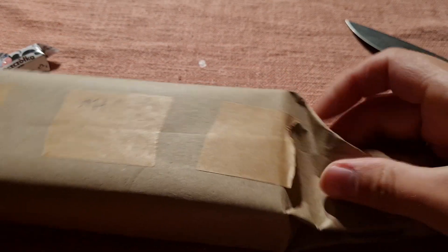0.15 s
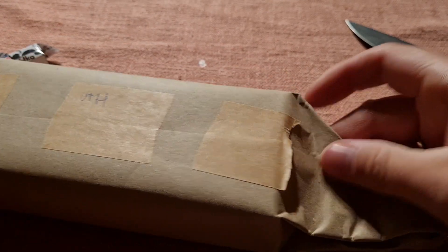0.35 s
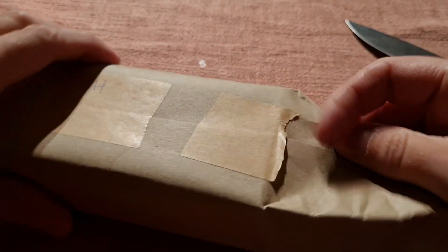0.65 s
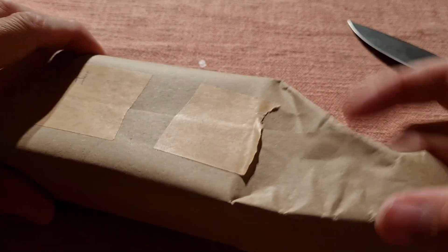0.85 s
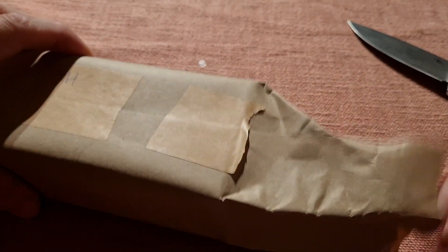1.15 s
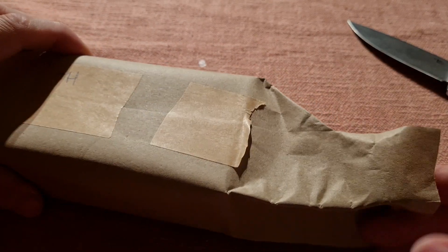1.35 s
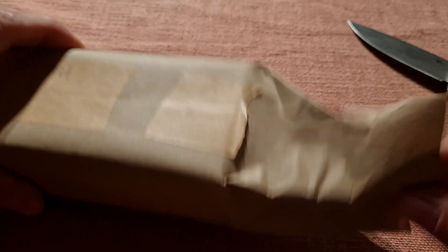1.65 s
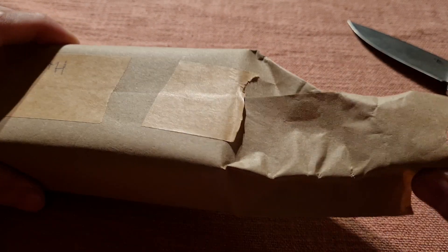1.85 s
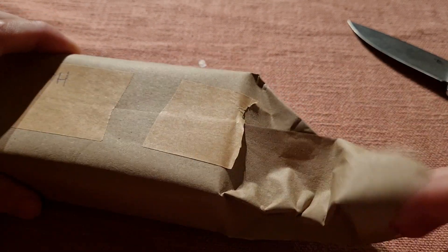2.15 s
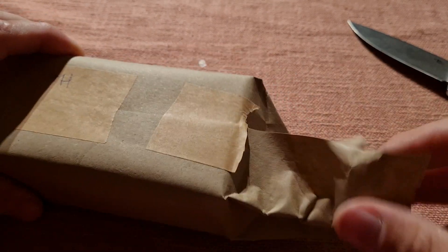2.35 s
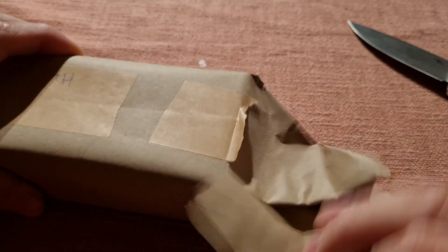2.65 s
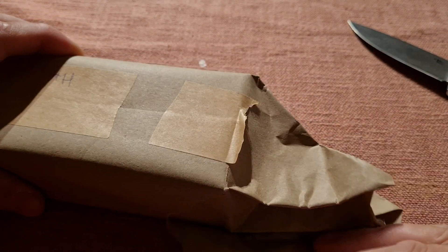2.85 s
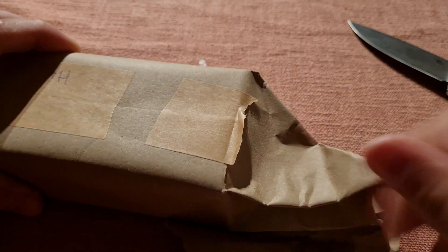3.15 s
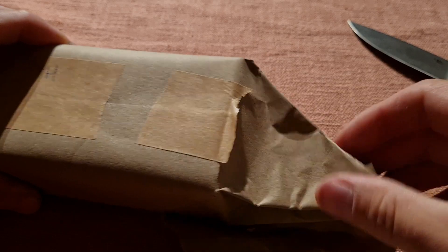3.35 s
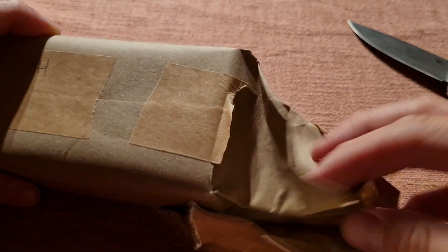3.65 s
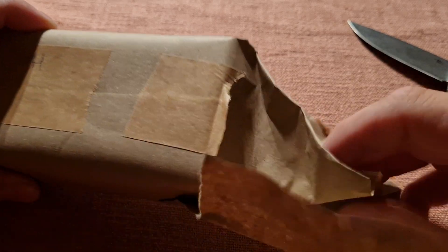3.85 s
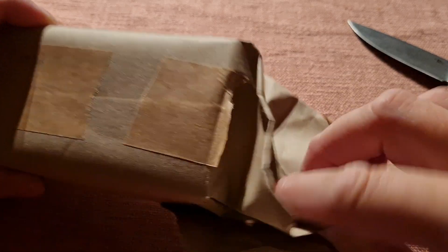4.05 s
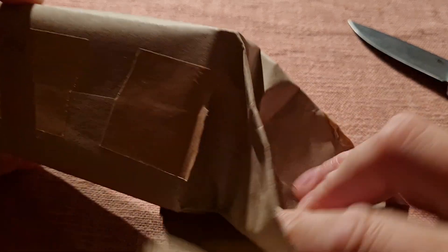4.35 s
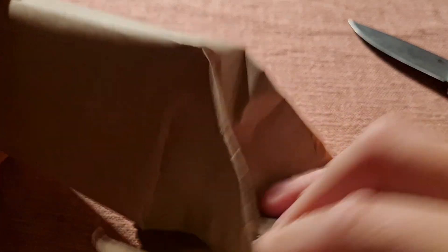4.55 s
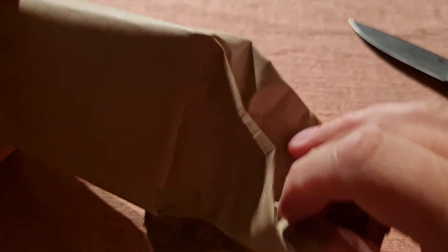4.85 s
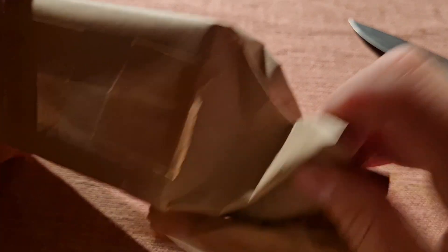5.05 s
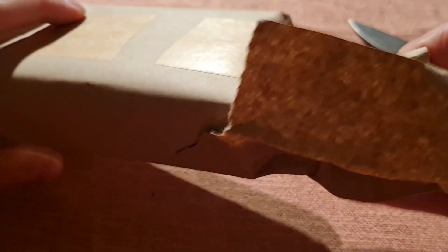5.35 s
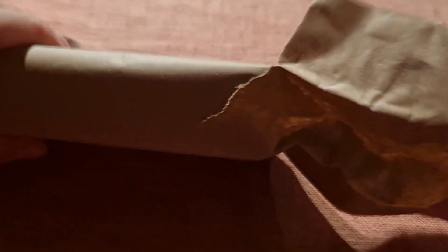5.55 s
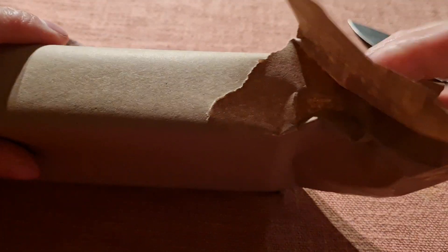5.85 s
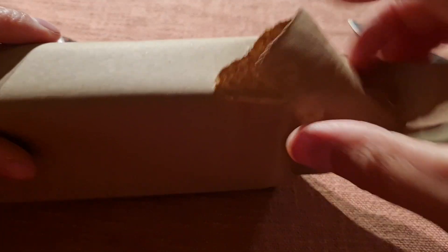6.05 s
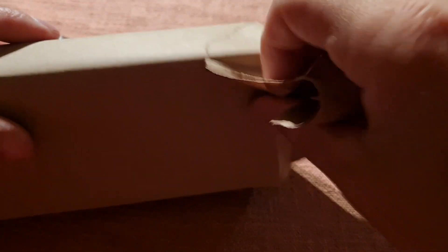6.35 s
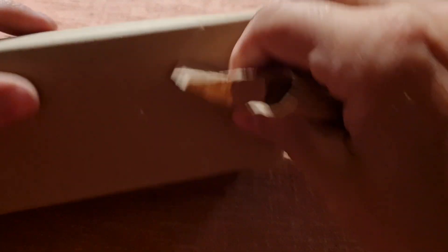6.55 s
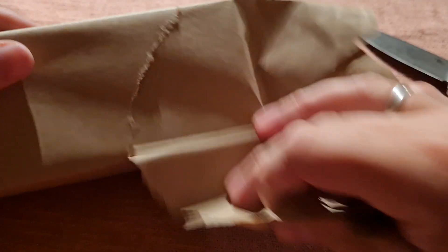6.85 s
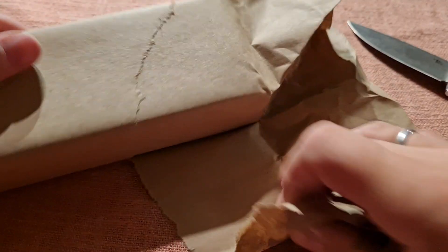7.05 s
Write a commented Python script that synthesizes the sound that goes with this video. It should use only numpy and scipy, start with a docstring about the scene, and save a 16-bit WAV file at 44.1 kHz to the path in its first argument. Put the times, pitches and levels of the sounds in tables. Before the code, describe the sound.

Close stereo sound of thick, stiff paper handled around a box in a small, dry room with faint low air. From 0 to 1.3 s, quick bright rustles and crisp snaps, strongest near 0.6 s, with a soft papery flap around 0.75. From 1.3 to 2 s it eases into smaller crackles and near pauses. At 2.03 s brisk crumpling resumes, leading to a short, jerky rip from 2.6 to 2.95 s, full of sharp fibre pops. Then quieter: isolated snaps near 3.1, 3.3 and 3.7, smooth finger glides around 4 and 4.6 to 4.9, a cluster of pops at 4.4. Rustling thickens from 5.2, with hollow low bumps around 5.5, growing denser through 6.5 s. A longer rip follows, dipping around 6.8 amid hard low snaps, surging to its loudest just before 7 s, then quickly trailing off.

```python
"""Thick paper around a box on a cloth-covered table, pulled, crumpled and twice ripped by hand, close up.
Showers of tiny damped rings over friction noise make the rustle and the tearing fibres; shaped noise bursts
make single snaps and ticks, loud and faint; damped sines make the sheet flap and the box bump; swept noise
makes fingers glide. Short noise tails answer as a small room, over faint air."""
import sys
import numpy as np
from scipy import signal
from scipy.fft import rfft, irfft, next_fast_len
from scipy.io import wavfile
from scipy.ndimage import uniform_filter1d, map_coordinates

SR = 44100
rng = np.random.default_rng(int(sys.argv[2]) if len(sys.argv) > 2 else 0)


def master_out(mix):
    """Clip the mix to full scale and print it as 16-bit PCM to the path in sys.argv[1]."""
    frames = np.transpose(np.atleast_2d(mix))
    ceiling = np.clip(frames, -1, 1)
    pcm = np.round(ceiling * 32767).astype(np.int16)
    wavfile.write(sys.argv[1], SR, pcm)


N = 317941

# frequency response of the microphones: f/Hz, level/dB
MIC_RESPONSE = [(30, -7), (55, -2), (5000, -1), (7400, 0.5), (8600, -8.5), (10500, -5), (15000, -5)]
ATTACK_S, RELEASE_DB_PER_S = 0.011, 456  # the paper takes up a movement and settles after it


def amp(db):
    """Decibels to gain."""
    return 10 ** (np.asarray(db) / 20)


def unit(x):
    """x at rms 1."""
    return x / np.sqrt(np.mean(x ** 2) + 1e-20)


def along(points, hz):
    """Read a curve of (Hz, value) points on a log frequency axis."""
    f, v = np.transpose(points)
    return np.interp(np.log(hz + 1), np.log(f + 1), v)


def wobble(rate):
    """A smooth random curve with rate knots a second."""
    knots = rng.standard_normal(int(N * rate / SR) + 4)
    return map_coordinates(knots, [np.arange(N) * rate / SR])


def filtered(x, response):
    """x with its spectrum multiplied by a response of frequency."""
    m = next_fast_len(N + SR // 2)
    hz = np.fft.rfftfreq(m, 1 / SR)
    return irfft(rfft(x, m) * response(hz), m)[..., :N]


def causal(gain):
    """The quickest causal (minimum-phase) response that has this gain."""
    cepstrum = irfft(np.log(np.maximum(gain, 1e-6)))
    half = len(cepstrum) // 2
    folded = np.r_[cepstrum[0], 2 * cepstrum[1:half], np.zeros(half)]
    return np.exp(rfft(folded))


def add(track, s, sound):
    """Mix a sound into a track at s seconds."""
    part = track[:, max(round(s * SR), 0):][:, :sound.shape[-1]]
    part += sound[..., :part.shape[1]]


def ports(pair, hz):
    """Two unrelated spectra become left and right: alike in the bass, apart in the treble."""
    # left-right correlation: f/Hz, likeness/1
    likeness = [(100, 1), (300, 0.85), (700, 0.83), (1400, 0.5), (2800, 0.27), (6000, 0), (14000, 0.016)]
    turn = np.arccos(np.clip(along(likeness, hz), -1, 1)) / 2
    mid, side = pair[0] * np.cos(turn), pair[1] * np.sin(turn)
    return np.array([mid + side, mid - side])


def sway():
    """Left and right gains that follow where the hands work."""
    # balance: t/s, left over right/dB
    balance = [(0, 1), (.7, 0.5), (1.6, 0), (2.5, 1.5), (3.2, 1), (3.7, 0.5), (4.3, 2.5), (5.0, 3.5),
               (5.7, 0.5), (6.6, 2), (7.2, 0.5)]
    left_db = np.interp(np.arange(N) / SR, *np.transpose(balance))
    return amp(np.array([[.5], [-.5]]) * left_db)


def gesture(length, swell_db):
    """Gain of one movement: a quick attack, a hold that swells or eases, a steady release."""
    t = np.arange(SR // 2) / SR - ATTACK_S / 2
    attack = np.clip(t / ATTACK_S + .5, 0, 1)
    hold_db = swell_db * (np.clip(t / length, 0, 1) - .5)
    return attack * amp(hold_db - RELEASE_DB_PER_S * np.maximum(t - length, 0))


def handling(slack_db=-15):
    """Strokes and the holding hand add in power to relative bulge, flex, crackle and fizz levels in dB."""
    # a hand pushes, pulls or slides the paper: start/s, length/s, crackle level/dB, swell over the stroke/dB,
    # then relative to the crackle: bulging/dB, flexing/dB, fizz/dB
    strokes = [(0, 0.087, -39.5, -14, -10, -5, -1.5), (0.113, 0.042, -39.5, 10, -11.5, -5.5, 2),
               (0.2, 0.043, -40.5, 5, -15, -4.5, 0.5), (0.254, 0.14, -45.5, 5.5, -11.5, -3, 0),
               (0.401, 0.018, -49, 18, -9, -2, -1.5), (0.542, 0.045, -51, 0, -37, -3, 1.5),
               (0.581, 0.048, -38.5, -0.5, -2.5, -5.5, -1), (0.633, 0.039, -30.5, 0, -17, -3.5, -2),
               (0.686, 0.074, -42.5, -1, -10, 8, 0.5), (0.769, 0.092, -45.5, 11.5, -14, -1, -0.5),
               (0.887, 0.075, -37, 3.5, -12.5, 0, -0.5), (0.989, 0.073, -40, 3.5, -9.5, 3, 2.5),
               (1.116, 0.028, -39, 10.5, -14, -4.5, 6), (1.197, 0.027, -50, 2, -13, -5, 1),
               (1.22, 0.039, -45, -11, -7, -2.5, 5.5), (1.373, 0.087, -46, 5, -16, 1, -2),
               (1.503, 0.1, -52.5, 2, -10, 1, 1), (1.598, 0.043, -42.5, 10.5, -20, -3.5, -2),
               (1.702, 0.12, -47.5, -10, -15, 0.5, 2), (1.869, 0.027, -53.5, 8, -9.5, -3, 0),
               (1.943, 0.11, -61, -9, -6, 1, -3), (2.034, 0.048, -36.5, 0, -11, -2, -3),
               (2.083, 0.17, -38.5, 14, -15, -8, -2.5), (2.274, 0.12, -40.5, 5, -14.5, -3.5, -5),
               (2.442, 0.17, -39, 0, -16.5, -6, -2.5), (3.049, 0.094, -47, 3, -12, -6, 0),
               (3.332, 0.046, -49, -9, -29, -9, -5), (3.473, 0.14, -49, 4, -12.5, -0.5, -2.5),
               (3.635, 0.093, -40.5, -13, -16.5, -6, -8), (3.712, 0.044, -52.5, -3, -1, 1, 1),
               (3.845, 0.032, -48, 1.5, -13.5, -1, -2), (4.183, 0.077, -53.5, 6, -3, -24, -0.5),
               (4.455, 0.067, -42, -9, -16, -2, -6), (4.92, 0.05, -56.5, 13, -4, -3, -6),
               (5.032, 0.031, -48, -8, -16, -3, -4), (5.08, 0.053, -49, 0, -8, -1, -6),
               (5.155, 0.061, -48, 6, -15, -2.5, -2), (5.238, 0.087, -39.5, -13, -8.5, -9, -6.5),
               (5.351, 0.032, -48, -6, -1, -3, -4), (5.459, 0.046, -41.5, 13.5, -10, -4.5, 4),
               (5.55, 0.12, -42.5, 9.5, -6, -2, -4.5), (5.79, 0.07, -38.5, 4, -7.5, -3, 0),
               (5.869, 0.13, -43.5, -3.5, -7.5, -3, -0.5), (6.014, 0.052, -38, 6.5, -11, -4.5, 0.5),
               (6.088, 0.062, -36.5, 11.5, -12, -2, -1), (6.181, 0.044, -42.5, -9, -7, -4, -4),
               (6.251, 0.061, -39.5, 1, -17, -3, -7), (6.305, 0.036, -31, 1.5, -10, -6, 1),
               (6.373, 0.083, -41, 6, -13, -2.5, -4), (6.448, 0.14, -34.5, -3, -19, -2.5, -7)]
    # the hand lets go of the paper: from/s, to/s
    pauses = [(1.265, 1.368), (1.815, 2.022)]
    t = np.arange(N) / SR
    loose = sum(np.clip((t - start) / ATTACK_S, 0, 1) * (t < end) for start, end in pauses)
    # faint rustle under a holding hand: crackle level, then bulge, flex, crackle and fizz against it
    grip_db = -55.5 + np.array([[-15.5], [-3.5], [0], [-2]]) + slack_db * loose
    power = amp(grip_db) ** 2
    for start, length, db, swell_db, bulge_db, flex_db, fizz_db in strokes:
        registers = amp(db + np.array([bulge_db, flex_db, 0, fizz_db]))
        add(power, start - ATTACK_S / 2, np.outer(registers, gesture(length, swell_db)) ** 2)
    return 10 * np.log10(power)


def grains(rate, low_hz, high_hz, cycles, spread_db, size):
    """Two channels of tiny damped rings at random moments, pitches and strengths, rms 1."""
    count = int(rate * N / SR)
    when, pitch, strength, left, right = rng.random((count, 5)).T[:, :, None]
    hz = low_hz + (high_hz - low_hz) * pitch
    turns = np.float32(hz / SR) * np.arange(size, dtype=np.float32)
    strength = np.minimum(-np.log(1 - strength), 4)  # exponential spread, capped
    fade = amp(spread_db * strength) * np.sqrt(hz) * np.exp(-turns / cycles)
    at = ((when * N).astype(int) + np.arange(size)).ravel()
    channels = []
    for phase in (left, right):
        rings = fade * np.sin(2 * np.pi * (turns + np.float32(phase)))
        channels.append(np.bincount(at, rings.ravel(), N)[:N])
    return unit(np.array(channels))


def hollow(hz):
    """Decibels by which the resonances of the wrapped box colour the paper."""
    # box resonances: f/Hz, width/Hz, height/dB
    box_modes = [(278.5, 83, 8.5), (394, 17, 6), (583, 37, 3.5), (750, 90, 3.5), (885, 18, 5.5),
                 (1214, 150, 2)]
    return sum(db / (1 + (2 * (hz - centre) / width) ** 2) for centre, width, db in box_modes)


def paper(drive, spectrum, low_hz, high_hz, smooth_db):
    """One register of the sheet: grains on a bed of friction noise, coloured by paper and box, rms 1."""
    m = next_fast_len(N + 8192)
    hz = np.fft.rfftfreq(m, 1 / SR) + 1
    band = 1 / np.sqrt((1 + (low_hz / hz) ** 8) * (1 + (hz / high_hz) ** 8))
    drive = drive + amp(smooth_db) * rng.standard_normal((2, N))
    # the spectrum is set as heard through the microphones, so their response is taken off here
    colour = band * amp(along(spectrum, hz) + hollow(hz) - along(MIC_RESPONSE, hz))
    return unit(irfft(ports(rfft(drive, m) * colour, hz), m)[:, :N])


def jerks(rate, depth_db, settle_s):
    """Stick and slip: a gain that jumps at uneven moments and settles in between, rms 1."""
    t = np.arange(N) / SR
    gap, strength = rng.random((int(2 * rate * N / SR), 2)).T
    slips = np.r_[0, np.cumsum(.5 + gap) / rate]
    last = np.minimum(np.searchsorted(slips, t, side="right") - 1, len(gap) - 1)
    settling = np.exp(-(t - slips[last]) / settle_s)
    return unit(amp(depth_db * (-0.5 + strength[last]) * settling))


def rustle(bulge_db, flex_db, crackle_db, fizz_db):
    """The sheet bulges, facets flex, small creases tick and fingers slide in fits and starts."""
    # rubbed paper: f/Hz, density/dB per Hz
    rubbed = [(53, -43), (90, -10.5), (244, -4.5), (278, -4), (338, -4), (385, -1), (804, -4.5), (1270, 2),
              (1790, -1), (2130, -4), (2380, -7), (7490, -5), (8720, -19.5), (12100, -16), (16000, -16)]
    bulge = grains(300, 83, 760, cycles=1.74, spread_db=3, size=800)
    bulge = amp(bulge_db + 1.5) * paper(bulge, rubbed, 69, 590, smooth_db=11.5)
    flex = grains(600, 351, 1924, cycles=3.2, spread_db=1.0, size=450)
    flex = amp(flex_db - 2.0) * paper(flex, rubbed, 580, 1105, smooth_db=2.5)
    crackle = grains(1200, 1000, 8560, cycles=2.9, spread_db=1.5, size=120)
    crackle = amp(crackle_db - 1.5) * paper(crackle, rubbed, 2025, 5230, smooth_db=4.5)
    fizz = grains(2400, 8800, 14200, cycles=3.6, spread_db=3.0, size=40)
    fizz = amp(fizz_db + 2.0) * paper(fizz, rubbed, 9200, 16600, smooth_db=6.0)
    ticks = grains(130, 960, 6200, cycles=3.0, spread_db=-0.5, size=160)
    ticks = amp(crackle_db - 14.0) * paper(ticks, rubbed, 520, 15000, smooth_db=-37)
    motion = jerks(80, depth_db=8, settle_s=0.0042) * amp(1.72 * wobble(90))
    return motion * (bulge + flex + crackle + fizz + ticks)


def reshaped(x, depth_db):
    """As the sheet changes shape, narrow resonances come and go."""
    hz, t, z = signal.stft(x, SR, nperseg=1024)
    # random heights, 16 knots a second; towards the treble, 7 knots an octave
    at = np.meshgrid(7 * np.log2(1 + hz / 400), 16 * t, indexing="ij")
    field = map_coordinates(rng.standard_normal((48, 128)), at)
    return signal.istft(z * unit(amp(depth_db * field)), SR, nperseg=1024)[1][:, :N]


def snaps(size=2048):
    """A facet of the sheet pops in milliseconds and rings; big facets ring low, hard pops are crisper."""
    # single snaps and ticks, loud and faint: popping creases, catches and knocks of the tearing sheet:
    # t/s, relative level/dB, facet pitch f/Hz, facet ring/dB, dullness/dB per octave,
    # then any marked further modes as (f/Hz, height/dB)
    pops = [(.0047, -30, 520, 10, 1), (.044, -25, 2860, 7, 4), (0.072, -37.5, 694, 6, 9),
            (0.125, -35, 1590, 6, 3), (0.1439, -14, 6200, -2.5, -2.5), (0.3156, -25.5, 1040, 6, 9),
            (0.4223, -33, 3080, -17, 9.5), (0.4522, -34.5, 1070, 6.5, 8), (.642, -22, 1970, 2, 7),
            (0.658, -22, 1380, 8, 6), (0.6658, -16.5, 1500, 14, -1), (0.7007, -25.5, 624, 2, 10),
            (.7115, -30, 2200, 9, 8), (.722, -33, 600, 9, 9), (.736, -32, 600, 7, 10),
            (.743, -34, 1100, 6, 10), (0.752, -33, 520, 12, 2), (0.804, -33, 1180, 17, -1),
            (0.827, -35.5, 685, 5, 15), (0.8512, -21.5, 3200, 5, 6), (.864, -35, 1000, 6, 4),
            (0.8878, -19.5, 4300, 2, 9), (0.91, -35, 900, 8, -1), (0.9405, -21, 940, 5, 1.5),
            (.952, -31, 700, 7, 5), (0.958, -28.5, 1650, 9, 9), (1.005, -37, 720, 10, 6),
            (1.015, -37, 650, 10, 3), (1.0335, -30, 690, 10.5, 3.5, (1400, 9)), (1.047, -35, 1300, 6, 6),
            (1.0599, -32.5, 1030, 15, 6), (1.1305, -19, 1300, 11, 2, (2300, 8), (2800, 7), (5300, 14),
            (13000, 9)), (1.2235, -23, 3720, 5.5, 1.5), (1.2625, -40, 1380, 7, 8),
            (1.3738, -36, 1380, 16, -1), (1.385, -29.5, 1530, 11, 0), (1.45, -36, 1090, 11, 7),
            (1.458, -35, 1110, 18, 6), (1.467, -31, 1370, 7, 14), (1.4765, -28.5, 1190, 18, 2),
            (1.536, -37, 1010, 7, 11), (1.6224, -27, 1250, 9.5, 3.5), (1.676, -24.5, 1940, 10, 11),
            (2.0256, -33, 3900, 13, -2.5), (2.057, -25, 1500, -7, 0), (2.0681, -29, 1680, 3, 1),
            (2.1095, -18.5, 3000, 3, 4, (3800, 5), (5600, 10)), (2.1599, -24.5, 1580, 10, 5.5),
            (2.182, -31.5, 1460, 5, 13), (2.192, -26.5, 1670, 5, 4.5), (2.2495, -19, 587, 4, 1),
            (2.2558, -21, 4400, 9, -0.5), (2.344, -31.5, 1120, 8, 4), (2.389, -23.5, 3100, 5, 11.5),
            (2.4059, -29.5, 1220, 9, 3), (2.5225, -19.5, 1320, 4.5, 1), (2.5445, -18, 4650, 10, 1.5),
            (2.5453, -18, 1200, 12.5, 2), (2.6065, -17.5, 716, 16.5, 0), (2.6077, -19, 3030, 8, 4),
            (2.652, -25, 1400, 3, 0), (2.667, -22.5, 2700, 8, 2), (2.686, -19, 5800, 12, -3),
            (2.7243, -21, 2600, -3, 7), (2.7286, -22, 3400, 0, -2), (2.747, -25, 1700, 5, 1),
            (2.773, -23.5, 3720, 12, 1), (2.778, -21, 3300, 6, 18), (2.7932, -16, 3740, 4, 1),
            (2.802, -21, 1720, 18, 4), (2.8048, -21, 1650, 6, 2), (2.827, -22, 4100, 9, 3),
            (2.8168, -20, 2230, 4, 4.5), (2.8547, -16, 3150, 16, -4.5), (2.859, -26, 3000, 2, 0),
            (2.868, -26, 2100, 5, -2), (2.876, -18, 2020, 29.5, -8), (2.897, -22, 3400, 4, -2),
            (2.902, -25, 2100, 8, 0), (2.928, -24, 6000, 3, 0), (2.9335, -24, 6500, 2, 0),
            (2.9391, -23, 6550, 9.5, 2), (3.003, -44.5, 1180, -5, 17), (3.067, -26, 5640, -8, 8),
            (3.1032, -22, 5300, -4, 8), (3.138, -34, 2670, 4, 12), (3.28, -27.5, 674, 13.5, -0.5),
            (3.2987, -24, 4400, 2, 8), (3.524, -41, 1200, 0, 4.5), (3.669, -19, 5000, 3, 4, (4200, 9),
            (6200, 4)), (3.682, -19.5, 660, 14.5, -2), (3.7139, -32.5, 1480, -6, 13.5),
            (3.7704, -48, 2070, 9, 9), (3.853, -45, 2310, 7, 9), (3.87, -46, 1900, 5, 9),
            (3.94, -40, 3000, 3, 4), (3.9506, -37, 3230, 9, 15), (4.042, -34, 2000, 7, 5),
            (4.05, -25, 640, 9, -1, (2100, 6), (3400, 6)), (4.078, -37, 1720, 5, 3),
            (4.1315, -35, 600, 5, 3), (4.134, -29, 2200, 3, 9, (1300, 7)), (4.1611, -42, 2070, 10, 3),
            (4.25, -43, 2580, 10, 2), (4.3004, -38.5, 1760, 3, 7), (4.3486, -40, 660, -1, 5.5),
            (4.3715, -35, 500, 4, 4), (4.3809, -30, 1410, -3, 11), (4.3959, -20.5, 1180, 2.5, 6, (1800, 7),
            (2250, 7)), (4.4014, -26.5, 2030, 5, 15), (4.4551, -19.5, 4200, 6, 1.5),
            (4.4774, -32.5, 1910, 15, 13), (4.5001, -35.5, 2600, 4, 16), (4.6618, -28.5, 2070, 13, 2),
            (4.8938, -27.5, 2900, 0, 7, (4900, 12), (7000, 5)), (4.968, -38, 2020, 6, 15, (2900, 6)),
            (4.982, -26, 2100, 11, 11, (2750, 9), (3700, 12)), (5.1082, -41, 685, 7, 5),
            (5.1904, -25.5, 2200, 3, 11, (3500, 15), (7000, 7)), (5.212, -36, 1220, 25, 5),
            (5.247, -31, 840, 1, 7), (5.258, -29.5, 1940, 11, 6), (5.2642, -28, 770, 1, 10),
            (5.2844, -21.5, 2850, 7, 11, (4150, 14), (5500, 8)), (5.3582, -40, 520, 8, 4),
            (5.371, -37, 1110, 9, 4), (5.485, -35, 975, 5, 19), (5.6496, -20.5, 1270, 13, 8.5),
            (5.699, -34.5, 1530, 3, 10), (5.807, -27, 2190, -2, 12), (5.833, -35, 1920, 11, 11),
            (5.851, -32.5, 2220, 8, 16), (5.9035, -33.5, 1030, 4, 4), (5.956, -37.5, 1030, 11, 8),
            (6.074, -31.5, 497, 5, 3.5), (6.1422, -22.5, 1130, 2.5, 1.5), (6.2808, -32, 950, 0, 8),
            (6.3196, -22.5, 513, 10, 1), (6.327, -26.5, 4460, 8, 10), (6.4, -24, 2950, 8, 21),
            (6.4546, -25.5, 2870, 8, 8), (6.469, -26, 1990, 5, 4.5), (6.4963, -14, 2870, 8, 2.5, (2800, 7)),
            (6.4965, -17, 1480, 1.5, 11), (6.5026, -19.5, 1960, 4, 3), (6.533, -24.5, 1500, -4, 9),
            (6.598, -24, 5000, 14, 10), (6.615, -31, 2010, 17, 8), (6.6389, -18.5, 3450, 4, 3),
            (6.709, -26, 4000, 4, 3), (6.7933, -18, 890, 1, 2, (5000, 6)), (6.809, -13, 900, 23, -4),
            (6.817, -28.5, 950, 14, 6), (6.823, -29.5, 960, 12, 6), (6.833, -20.5, 820, 15, 5.5, (1300, 6)),
            (6.844, -25.5, 870, 10, 14), (6.851, -26, 870, 14, 8), (6.8798, -22, 6030, 6, 3),
            (6.903, -26, 1000, 11, 6), (6.917, -24, 960, 14, 3), (6.922, -24, 786, 12, 3.5),
            (6.933, -24, 1100, 12, 6), (6.961, -20.5, 7100, 5, 5), (6.976, -21, 1220, -3, 3.5),
            (6.992, -22, 3000, -3, 3)]
    base_t60_s, crisp_db = 0.01012, 60  # decay of a -25 dB pop; one louder by crisp_db is ten times shorter
    facet_width_oct, facet_damping_hz = 0.2, 130  # the fingers damp big, low facets most
    upper_spacing_oct, upper_db = 0.591, 5
    out = np.zeros((2, N))
    t, hz = np.arange(size) / SR, np.fft.rfftfreq(size, 1 / SR) + 1
    for s, db, pitch_hz, ring_db, dullness, *modes in pops:
        t60 = base_t60_s * 10 ** (-(db + 25) / crisp_db)
        burst = rng.standard_normal((2, size)) * amp(-60 * t / t60)
        burst *= 1 + 0.4 * np.exp(-t / 0.000084)  # the first break is the sharpest
        drive = rfft(burst)
        # a break is broadband: flatten its spectrum
        drive /= np.sqrt(abs(uniform_filter1d(abs(drive) ** 2, size=50)) + 1e-9)

        octaves = np.log2(hz / pitch_hz)
        width_oct = facet_width_oct + facet_damping_hz / pitch_hz
        main_mode = 1 / (1 + (octaves / width_oct) ** 2)
        # every facet has its own shape: random upper modes, unless marked ones replace them
        upper_octaves = (np.arange(4) + 1 + rng.random(4))[:, None] * upper_spacing_oct
        further_db = upper_db * np.sum(1 / (1 + ((octaves - upper_octaves) / 0.048) ** 2), axis=0)
        if modes:
            further_db = sum(mode_db / (1 + (np.log2(hz / mode_hz) / 0.11) ** 2) for mode_hz, mode_db in modes)
        tilt_db = 4 * np.minimum(octaves, 0) - dullness * np.maximum(octaves, 0)
        facet_db = ring_db * main_mode + further_db + tilt_db

        # a strongly ringing facet flips in one push: a single delayed click replaces the noise
        clean = main_mode * np.clip(ring_db / 12, 0, 1)
        click = np.exp(-2j * np.pi * hz * t60 / 20)
        drive = np.sqrt(1 - clean ** 2) * ports(drive, hz) + clean * click
        radiated = hz ** 2 / (hz ** 2 + 200 ** 2)  # a light sheet radiates little bass
        snap = irfft(drive * causal(amp(facet_db) * radiated))
        snap *= np.clip(2 - 4 * t / t[-1], 0, 1)
        # equal energy: rms 1 as if spread over 5 ms
        snap /= np.sqrt(np.sum(snap ** 2, axis=1, keepdims=True) / (.005 * SR))
        add(out, s, snap * amp(db))
    return amp(0.5) * out


def room(x, size=8192):
    """Close walls answer evenly for a moment, then each band dies at its own speed; echoes vary by block."""
    # decay after the even moment: f/Hz, t60/s
    decay_times = [(150, 0.36), (1000, 0.11), (5000, 0.15), (15000, 0.064)]
    out = np.zeros((2, N))
    for first in range(0, N, size):
        hz, t, z = signal.stft(rng.standard_normal((2, size)), SR, nperseg=256)
        decay = amp(-60 * np.maximum(t - .018, 0) / along(decay_times, hz)[:, None])
        tail = signal.istft(ports(z, hz[:, None]) * decay, SR, nperseg=256)[1]
        tail[:, :SR // 300] = 0  # the first echo comes after 3.3 ms
        tail /= np.linalg.norm(tail[0])
        add(out, first / SR, signal.fftconvolve(x[:, first:first + size], tail, axes=1))
    return out


def hush():
    """The faint air of the room: steady noise, strongest in the bass."""
    spectrum = [(30, -7), (60, 9), (150, -2), (1000, -31), (15000, -38)]  # f/Hz, level/dB
    air = filtered(rng.standard_normal((2, N)), lambda hz: amp(along(spectrum, hz)))
    return amp(-74.5) * unit(air)


def bumps():
    """Soft, heavily damped pushes of the loose sheet and the box; low ones last longer."""
    # the sheet flaps and the box bumps: t/s, relative level/dB, pitch f/Hz
    pushes = [(0.585, -36, 163), (0.598, -27, 317), (0.655, -45, 89), (.758, -23, 623), (1.676, -24.5, 325),
              (1.908, -40, 710), (2.254, -38, 67), (3.292, -37, 180), (4.389, -30.5, 286),
              (4.477, -29, 298), (5.264, -31, 323), (5.354, -31.5, 343), (5.517, -23.5, 197),
              (5.522, -21.5, 312), (5.526, -24.5, 605), (5.539, -45, 80), (5.618, -26.5, 265),
              (5.62, -38, 99), (5.865, -36, 64), (6.334, -42, 64.5), (6.435, -27, 600), (6.721, -29, 304),
              (6.973, -39, 70), (7.052, -32.5, 600)]
    out, t = np.zeros((2, N)), np.arange(SR // 4) / SR
    for s, db, hz in pushes:
        t60 = 0.036 * (300 / hz) ** 0.72  # seconds
        around = signal.butter(2, [hz / 2, min(hz * 1.52, SR / 3)], "band", fs=SR, output="sos")
        flutter = unit(signal.sosfilt(around, rng.standard_normal(len(t))))
        push = np.sin(2 * np.pi * hz * t) + .5 * flutter
        thump = amp(db + 5.0 - 60 * t / t60) * (1 - np.exp(-t * hz * 2)) * push
        above = signal.butter(1, hz / 2, "high", fs=SR, output="sos")  # little radiates below the pitch
        add(out, s, signal.sosfilt(above, thump))
    return out


def tearing(bulge_db=-12):
    """Relative bulge, flex, bundle and fibre levels in dB of two rips; the taut sheet bulges as it flexes."""
    # first rip, catching on the way: t/s, fibre bundles/dB, flexing/dB, fine fibres/dB
    short_rip = [(2.62, -46, -73, -56), (2.652, -25.5, -32.5, -28.5), (2.692, -21, -33.5, -23),
                 (2.728, -23, -40, -25.5), (2.738, -27.5, -38, -31), (2.78, -19.5, -39, -26),
                 (2.829, -22.5, -31, -28.5), (2.842, -37, -57, -52), (2.86, -32.5, -36, -39),
                 (2.912, -26, -45.5, -28), (2.941, -31.5, -44, -30), (2.98, -53, -66, -67)]
    # second rip, which surges until the strip comes free and trails off: same columns
    long_rip = [(6.53, -60, -48, -39), (6.575, -26, -42.5, -30), (6.645, -22.5, -28, -26),
                (6.785, -37, -36, -38.5), (6.815, -32, -32.5, -29.5), (6.87, -30, -32, -28),
                (6.94, -24.5, -27, -28), (6.985, -16, -22, -19), (7.02, -35, -42, -42),
                (7.11, -47.5, -57, -51.5), (7.209, -44, -52, -46.5)]
    s, *levels = np.transpose(short_rip + long_rip)
    t = np.arange(N) / SR
    torn = ((t > short_rip[0][0]) & (t < short_rip[-1][0])) | (t > long_rip[0][0])
    bundles, flex, fibres = [np.where(torn, np.interp(t, s, level), -np.inf) for level in levels]
    return flex + bulge_db, flex, bundles, fibres


def rip(bulge_db, flex_db, bundle_db, fibre_db):
    """The tear advances in jerks; breaking bundles of fibres shake the taut sheet."""
    # tearing paper: f/Hz, density/dB per Hz
    torn = [(53, -54), (90, -31.5), (393, -12), (457, -11.5), (721, 0), (1350, -1.5), (1470, -5),
            (1950, 0.5), (2380, -2.5), (3010, 0), (5780, -1), (7490, -13), (8720, -24), (15000, -11.5),
            (16000, -17)]
    bulge = grains(300, 100, 696, cycles=1.06, spread_db=2.5, size=800)
    bulge = amp(bulge_db + 5.0) * paper(bulge, torn, 75, 550, smooth_db=-5)
    flex = grains(700, 342, 1787, cycles=4.7, spread_db=-0.5, size=450)
    flex = amp(flex_db - 2) * paper(flex, torn, 570, 1470, smooth_db=-2)
    bundles = grains(1000, 1220, 7730, cycles=2.5, spread_db=0.0, size=200)
    bundles = amp(bundle_db - 4.5) * paper(bundles, torn, 1070, 5200, smooth_db=-2)
    bundles = bundles * amp(1.3 * wobble(70))  # the fibres lie in thick and thin patches
    fibres = grains(3500, 7300, 16200, cycles=3.9, spread_db=2.0, size=40)
    fibres = amp(fibre_db + 5.0) * paper(fibres, torn, 8370, 11700, smooth_db=0.0)
    breaks = grains(220, 1040, 11500, cycles=0.47, spread_db=-4.5, size=80)
    breaks = amp(bundle_db - 8.0) * paper(breaks, torn, 1040, 17000, smooth_db=-30)
    jolts = grains(160, 1260, 4600, cycles=5.5, spread_db=-3, size=400)
    jolts = amp(bundle_db - 10) * paper(jolts, torn, 990, 5600, smooth_db=-30)
    motion = jerks(170, depth_db=5.5, settle_s=0.0013) * amp(0.75 * wobble(110))
    return motion * (bulge + flex + bundles + fibres + breaks + jolts)


def slides():
    """Smooth friction sounds the panel under the fingers, whose resonance drifts as they travel."""
    # fingers glide over the paper: start/s, length/s, level/dB, swell/dB,
    # resonance at the start f/Hz, at the end f/Hz, its height/dB, tilt/dB per octave
    glides = [(3.2, .09, -40, 5, 3000, 3300, 3, .3), (3.938, .115, -39, 3, 1850, 2100, 6, 0),
              (4.06, .11, -43, -7, 2100, 2250, 5, 0), (4.578, .078, -42, 8, 760, 860, 6, 0),
              (4.665, .11, -45, 3, 2100, 2000, 7, .6), (4.778, .112, -40, 9, 1950, 1800, 5, .5),
              (5.71, .08, -41, 6, 2450, 2750, 6, 0)]
    # skin on paper: f/Hz, density/dB per Hz
    skin = [(50, -45), (140, -11), (280, -4), (700, -3), (1100, -1), (1600, -3), (2200, -1), (4500, -1),
            (7400, -5), (8700, -14), (12000, -7), (16000, -7)]
    out = np.zeros((2, N))
    for start, length, db, swell_db, from_hz, to_hz, height_db, tilt in glides:
        gain = gesture(length, swell_db)
        hz, t, z = signal.stft(rng.standard_normal((2, len(gain))), SR, nperseg=512)
        hz = hz[:, None] + 1
        octaves = np.log2(hz / np.interp(t, [0, length], [from_hz, to_hz]))
        panel_db = height_db / (1 + (octaves / .14) ** 2) + tilt * octaves
        colour = amp(along(skin, hz) + hollow(hz) + panel_db - along(MIC_RESPONSE, hz))
        rub = signal.istft(ports(z, hz) * colour, SR, nperseg=512)[1][:, :len(gain)]
        add(out, start - ATTACK_S / 2, amp(db) * gain * unit(rub))
    flutter = amp(1.4 * wobble(180))  # roughness of the friction
    return out * flutter * jerks(70, depth_db=12, settle_s=0.002)


def scene():
    """The paper rustles, tears and snaps, mostly a little to the left, and the room answers."""
    # left-right colour of sheet and box: f/Hz, left over right/dB
    lean = [(80, 6.5), (300, 2.5), (700, 1), (1400, -2), (2800, 3.5), (5500, -1.5), (11000, 0.5)]
    place = sway()
    handled = rustle(*handling()) + rip(*tearing())
    sheet = place * (reshaped(handled, depth_db=1.8) + slides())
    parcel = filtered(sheet + bumps(), lambda hz: amp(along(lean, hz) * np.array([[.5], [-.5]])))
    pops = place * snaps()
    echoes = room(amp(-14.0) * parcel + amp(-14.5) * pops)
    return parcel + pops + echoes + hush()


def record(dry):
    """The microphones have a dip in the treble and a steep band limit."""
    top_hz = 16000

    def response(hz):
        """Microphone gain with the band limit."""
        return amp(along(MIC_RESPONSE, hz)) * np.clip((top_hz + 150 - hz) / 300, 0, 1)

    return filtered(dry, response)


dry = scene()
out = record(dry)
master_out(out)
```